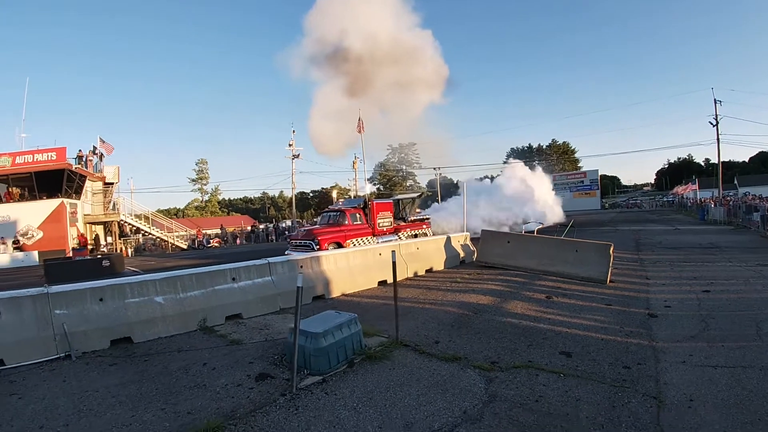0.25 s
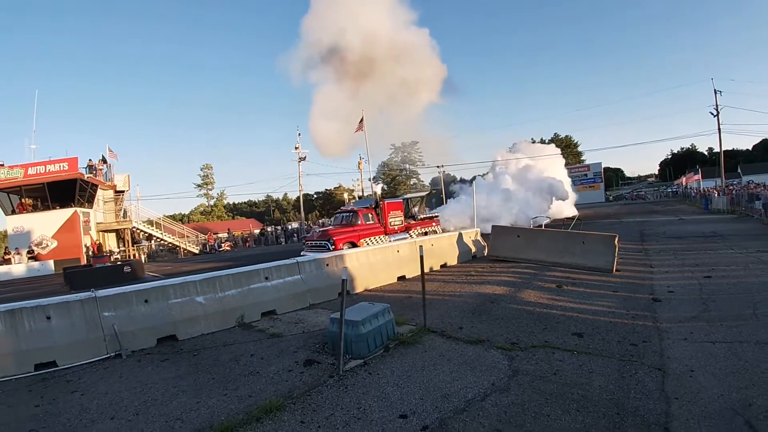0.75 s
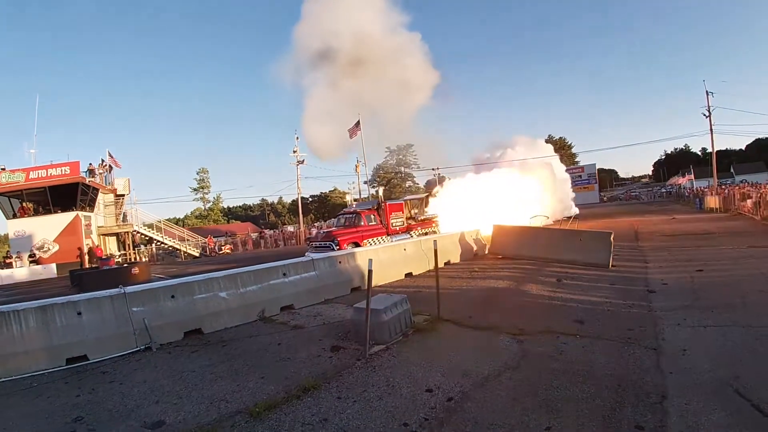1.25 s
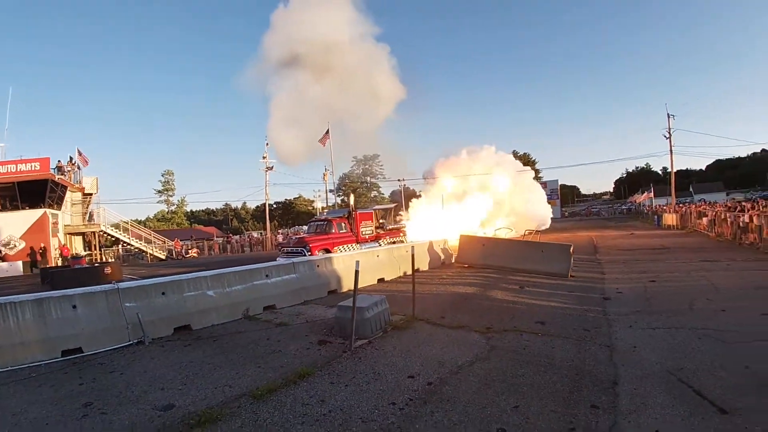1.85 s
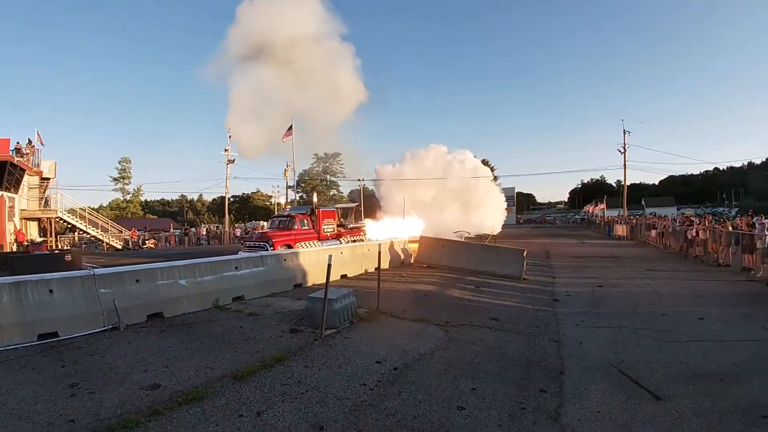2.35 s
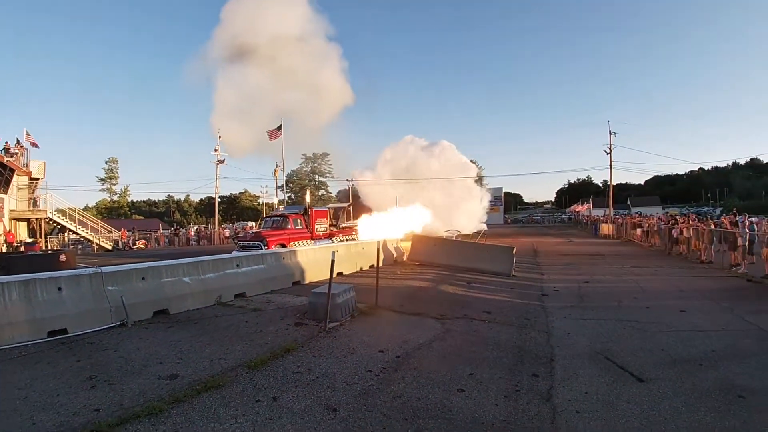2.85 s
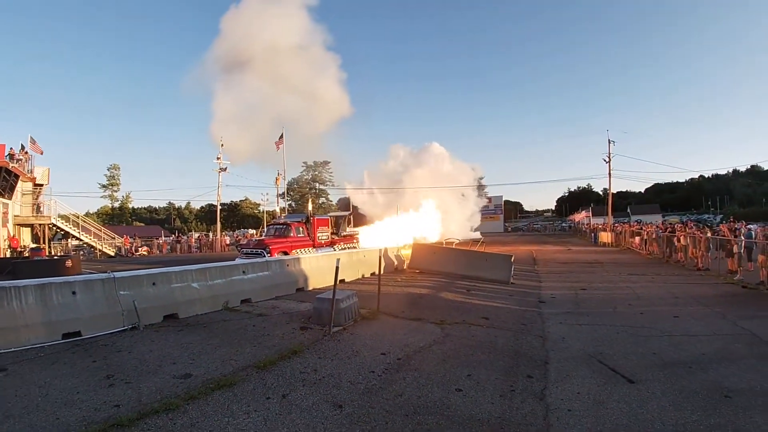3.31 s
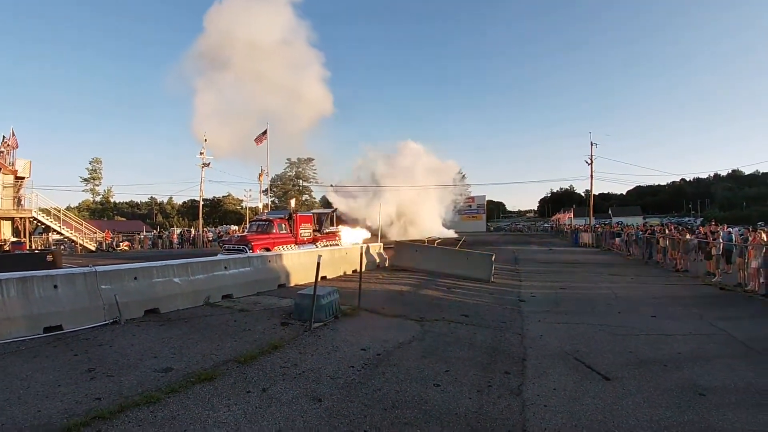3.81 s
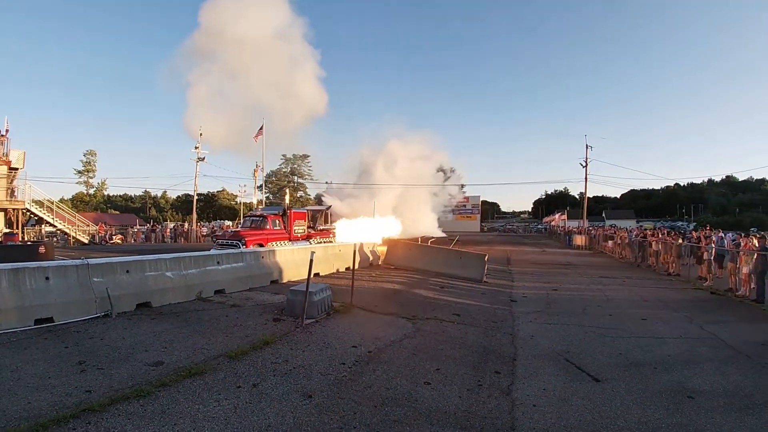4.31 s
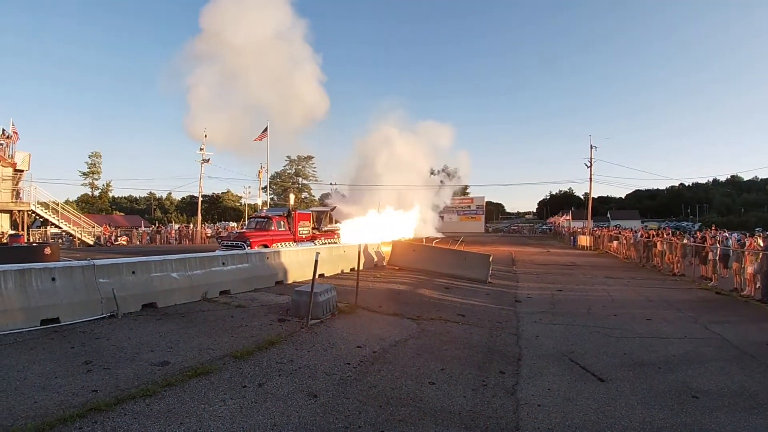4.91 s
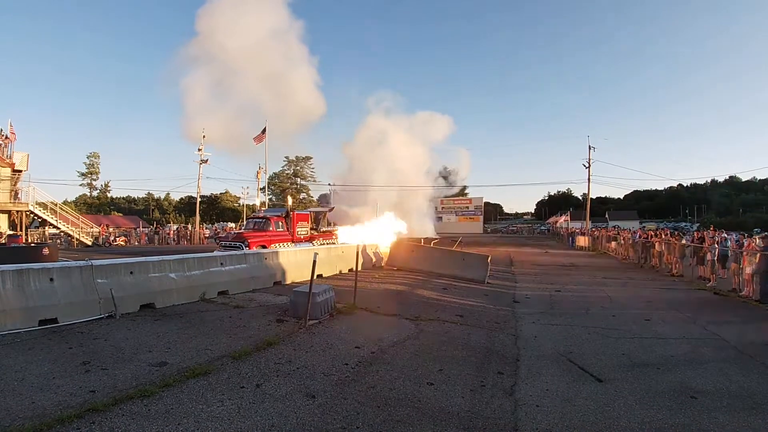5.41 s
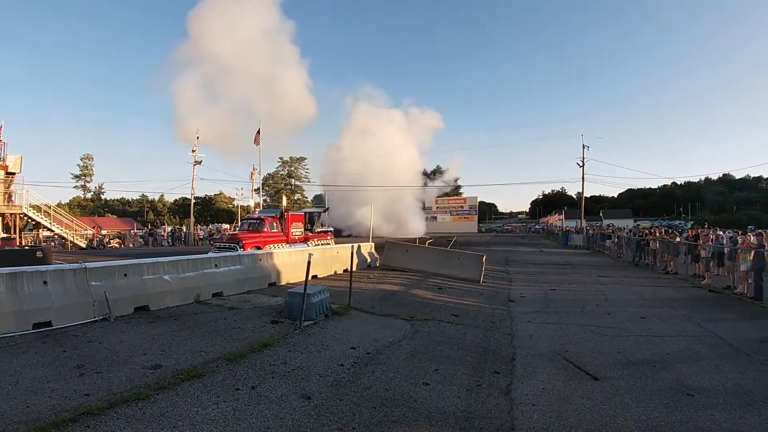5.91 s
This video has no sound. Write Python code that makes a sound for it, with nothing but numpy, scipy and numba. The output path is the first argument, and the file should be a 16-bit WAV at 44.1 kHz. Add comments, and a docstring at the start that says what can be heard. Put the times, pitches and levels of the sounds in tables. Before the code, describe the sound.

A jet truck idles loudly on an outdoor drag strip, its two turbines giving a dense, wavering, beating whine over airy hiss and low hum. After about a second the afterburner ignites with a hard thump, and a deep, ragged, stuttering roar pushes the whine down. At the end the flame dies and the whine returns. Phone microphone at some distance, compressing heavily.

```python
"""On a drag strip, a jet truck with two turbines idles, lights its afterburner and lets the flame die.
Compressor blade rows whine as sines on multiples of each shaft speed, over intake hiss of coloured noise.
The afterburner lights with a thump of decaying cosines and roars and rasps as coloured noise in a stuttering
flame. A phone's gain control turns everything down under it, letting the whine return as the flame dies."""
import sys
import numpy as np
from scipy import signal
from scipy.fft import rfft, irfft, next_fast_len
from scipy.io import wavfile
from scipy.ndimage import uniform_filter1d
from numba import njit

SR = 44100
rng = np.random.default_rng(int(sys.argv[2]) if len(sys.argv) > 2 else 0)


def store_pcm(level_fs):
    """Save levels as 16-bit WAV."""
    pcm = np.round(np.clip(level_fs, -1, 1) * 32767).astype(np.int16)
    wavfile.write(sys.argv[1], SR, np.atleast_2d(pcm).T)


N = 271656


def undb(db):
    """Decibel law: twenty dB is a factor of ten in amplitude."""
    return 10 ** (np.asarray(db) / 20)


def seconds():
    """Uniform sampling: the time of every sample in seconds."""
    return np.arange(N) / SR


def curves(table):
    """Linear interpolation: the columns after the first (time in s) as signals in time."""
    s, *columns = np.transpose(table)
    return [np.interp(seconds(), s, column) for column in columns]


def bumps(rows):
    """Superposition: a sum of bell-shaped rises, one for each (centre s, length s, height)."""
    t = seconds()
    return sum(height * np.exp(-((t - s) / max(length, 0.005)) ** 2) for s, length, height in rows)


def walk(rate_hz):
    """Band-limited fluctuation: random levels held 1 / rate s and averaged twice; spread near 1."""
    hold = int(SR / rate_hz)
    steps = np.repeat(rng.standard_normal(N // hold + 1), hold)
    slewed = uniform_filter1d(uniform_filter1d(steps, hold), hold)
    return 1.3 * slewed[:N]


def noise(spectrum):
    """Spectral shaping: white noise weighted by the given (Hz, dB) curve and scaled to rms 1."""
    hz, db = np.transpose(spectrum)
    size = next_fast_len(N)
    f = np.maximum(np.arange(size // 2 + 1) * SR / size, 1)
    weight = undb(np.interp(np.log(f), np.log(hz), db, -120, -120))
    x = irfft(rfft(rng.standard_normal(size)) * weight, size)[:N]
    return x / np.sqrt(np.mean(x ** 2))


def low_pass(x, hz, order):
    """Butterworth low-pass: maximally flat below its corner."""
    return signal.lfilter(*signal.butter(order, hz, fs=SR), x)


# Spectrum of the turbulent intake air. Each row: frequency in Hz, relative density in dB per Hz.
HISS_SPECTRUM = [(200, -39), (350, -1.5), (580, -2.5), (1000, -1), (1600, -0.5), (2400, -2.5), (3300, -1.5),
                 (3900, -3.5), (5200, -8.5), (7600, -10.5), (8900, -24.5), (9800, -25), (11500, -35),
                 (14000, -41)]
# Spectrum of the hiss that swells near 2.6 kHz. Each row: frequency in Hz, relative density in dB per Hz.
CLUSTER_SPECTRUM = [(2100, -20), (2400, -0.5), (2650, -2), (2900, -4), (3200, -18.5)]


def intake_hiss(cluster_db):
    """Turbulence noise: intake air hisses broadly, with a band near 2.6 kHz that swells."""
    hiss = undb(-19 + 0.19 * walk(6.7)) * noise(HISS_SPECTRUM)
    return hiss + undb(cluster_db - 30.0) * noise(CLUSTER_SPECTRUM)


def tone(hz, db, waver_hz, fade_db, flutter_db=2.0):
    """Scattering by turbulence: a blade tone wavers in pitch, fades and flutters in turbulent air."""
    phase = 2 * np.pi * (np.cumsum(hz + waver_hz * walk(25)) / SR + rng.random())
    level_db = db + fade_db * walk(4.04) + flutter_db * walk(18)
    return np.sqrt(2) * undb(level_db) * np.sin(phase)  # root 2 makes the level an rms


# Slow hunting of both shafts, before inertia smooths it.
# Each row: time in seconds, shaft speed of engine A in Hz, of engine B in Hz.
SHAFT_SPEEDS = [(0, 109.0, 113.16), (.55, 108.84, 113.02), (1.05, 108.9, 113.1), (1.35, 108.8, 112.75),
                (1.55, 108.98, 112.58), (2.2, 108.93, 112.76), (2.78, 108.42, 112.08),
                (3.65, 109.14, 113.58), (4.22, 108.26, 112.04), (5.05, 109.32, 113.66),
                (5.75, 108.42, 112.1), (6.16, 108.72, 112.9)]
# Strongest blade tones as multiples of the shaft speed. One column for each tone, no unit.
MAIN_ORDERS = (17, 20, 34, 51)
# Resting levels of the strongest tones. Each row is an engine (A, B), each column a main order, in dB.
MAIN_REST_DB = [(-36, -34.5, -34, -42.5), (-34.5, -33.5, -34, -44.5)]
# Swells of the strongest tones, nested by engine and main order.
# Each row: centre in seconds, length in seconds, rise in dB.
MAIN_SWELLS = [
    [[(0, 0.14, 6), (1.03, 0.18, 9.5), (1.4, .15, 8), (2.85, 0.14, 15), (5, .2, 5.5), (6.1, .15, 7)],
     [(.4, 0.088, 9), (.92, 0.31, 7.5), (1.7, .15, 7.5), (2.8, 0.23, 6), (3.2, 0.17, 3.5),
     (6.05, 0.39, 11)], [(.1, 0.36, 8), (.65, 0.13, 5.5), (1.7, 0.19, 6.5), (2.1, 0.073, 8),
     (3.5, 0.45, 10.5), (4.2, .12, 3), (4.93, 0.14, 9), (5.25, 0.085, 4)], [(3.3, .4, 3), (4.5, 0.47, 7),
     (5.2, 0.33, 4.5), (5.75, 0.18, 9.5)]],
    [[(1.35, 0.28, 5.5), (2, 0.12, 9.5), (2.35, 0.22, 10), (2.8, .15, 7.5), (3.2, 0.17, 9.5),
     (3.7, .15, 4.5), (4.1, .2, 2), (4.7, 0.18, 7), (5.4, 0.12, 9), (5.8, .1, 6.5), (6.16, .08, 6)],
     [(.05, 0.26, 9), (.55, 0.44, 5), (1.5, .25, 8), (2.33, 0.17, 6.5), (3.1, .15, 6.5), (4.95, .2, 5),
     (5.62, 0.18, 11), (6.16, 0.34, 16)], [(.2, .15, 4), (.75, 0.18, 4), (1.76, .1, 5), (3.1, .3, 13),
     (3.55, 0.17, 8), (4.18, 0.21, 10), (4.6, 0.23, 8.5), (5.68, 0.16, 8.5), (6.16, 0.11, 8)],
     [(.2, 0.49, 6), (3.7, .2, 6.5), (5.3, .3, 5)]],
]
# Weaker blade tones as multiples of the shaft speed. One column for each tone, no unit.
WEAK_ORDERS = (23, 26, 28, 37, 40, 42, 45, 60, 68, 85)
# Levels of the weaker tones. Each row is an engine (A, B), each column a weak order, in dB.
WEAK_DB = [(-35, -40, -46, -42, -44, -55, -48, -52, -45, -63),
           (-37, -50, -52, -38, -44, -48, -56, -55, -49, -66)]
# Steady-centred tones off both shaft series. Each row: frequency in Hz, level in dB.
LONE_TONES = [(657, -42.5), (1012, -39.5), (1265, -41.5), (2445, -46.5), (2670, -39.5), (2724, -40)]
INERTIA_S = 0.2  # averaging time of the shaft speed


def blade_whine(cluster_db, waver=0.001, weak_fade_db=2.5, main_fade_db=0.87):
    """Blade-passing tones: each row of blades sounds at a whole multiple of its shaft speed."""
    out = np.zeros(N)
    # pitch waver is a share of the frequency
    weak = [(hz, db, 2.46 * waver) for hz, db in LONE_TONES]
    for shaft_hz, rest_db, swells, weak_db in zip(curves(SHAFT_SPEEDS), MAIN_REST_DB, MAIN_SWELLS, WEAK_DB):
        shaft_hz = uniform_filter1d(shaft_hz, int(INERTIA_S * SR))
        weak += [(order * shaft_hz, db, waver) for order, db in zip(WEAK_ORDERS, weak_db)]
        for order, db, rows in zip(MAIN_ORDERS, rest_db, swells):
            hz = order * shaft_hz
            out += tone(hz, db + bumps(rows), waver * hz, main_fade_db)
    for hz, db, share in weak:
        # weak tones near 2.6 kHz swell together
        inside = 2400 < np.mean(hz) < 3000
        out += tone(hz, db + inside * cluster_db, share * hz, weak_fade_db)
    return out


# Reflection off the track, growing as the phone turns. Each row: time in seconds, share of amplitude.
GROUND_SHARE = [(1.4, 0.083), (3.3, 0.2)]
GROUND_LAG = 24  # samples


def track_reflection(whine):
    """Comb interference: an inverted late copy joins the direct sound; the rough track scatters its top."""
    share, = curves(GROUND_SHARE)
    return whine - share * np.roll(low_pass(whine, 4600, 2), GROUND_LAG)


def smoke_dulling(whine, smoke):
    """High-frequency absorption: smoke dulls a share of the whine above 3.2 kHz."""
    smoke = np.clip(smoke, 0, 1)
    return (1 - smoke) * whine + smoke * low_pass(whine, 3200, 1)


# Spectrum of the exhaust hum. Each row: frequency in Hz, relative density in dB per Hz.
EXHAUST_SPECTRUM = [(12, -48), (20, -23.5), (53, -7), (86, -7), (125, -0.5), (146, -3), (170, -9.5),
                    (320, -20.5), (600, -51.5)]
EXHAUST_DB, HOT_RISE_DB = -18, 8  # level at idle, and its rise from light-up on


def exhaust():
    """Jet mixing noise: the exhaust hums in the bass, louder from light-up on."""
    hot = np.clip((seconds() - FLAME[0][0]) / 0.2, 0, 1)
    return undb(EXHAUST_DB + HOT_RISE_DB * hot + 0.57 * walk(4.1)) * noise(EXHAUST_SPECTRUM)


# Course of the flame. Each row: time in seconds, roar level in dB, level of the tearing upper edge in dB
# relative to the roar, level of the deepest throb in dB relative to the roar.
FLAME = [(1.19, -33, -8, -10), (1.22, -8.5, -3.5, -15), (1.26, -4.5, -11, -9), (1.5, -3, -16, -11),
         (1.7, -3.5, -12.5, -9.5), (2.2, -1, -14, -10), (2.62, 0.5, -13, -9.5), (2.85, 2.5, -14, -10.5),
         (3.05, 4, -15.5, -16), (3.68, 4, -19, -11), (3.88, -0.5, -5.5, -6.5), (4.15, 3.5, -8, -8),
         (4.35, 1.5, -11.5, -12.5), (4.55, 3.5, -13, -15), (4.95, 1, -12, -9.5), (5.3, -1, -10, -4.5),
         (5.72, 0, -9.5, -15), (5.8, -6.5, -12.5, -11), (5.9, -12, -11.5, -4), (6.16, -15, -11, -10)]
# Stutters of the flame. Each row: centre in seconds, drop in dB, length in seconds.
STUTTERS = [(2.383, 7.5, 0.041), (2.567, 5, 0.058), (2.723, 11, 0.039), (2.942, 3, 0.026),
            (3.067, 4.5, 0.02), (3.5, 4, 0.045), (3.726, 6.5, .035), (4.234, 4, 0.057), (5.21, 4, 0.024),
            (5.918, 2, 0.036)]
# Spectra of the burning eddies, from the deepest throb to the roar and its tearing upper edge.
# Each row: frequency in Hz, relative density in dB per Hz.
THROB_SPECTRUM = [(10, -18.5), (20, -4.5), (40, -3.5), (65, -1.5), (100, -16)]
ROAR_SPECTRUM = [(12, -52), (20, -17), (49, -4.5), (103, -1.5), (140, -0.5), (210, -2), (270, -9),
                 (330, -20), (450, -53)]
EDGE_SPECTRUM = [(220, -13), (290, -1.5), (370, -2.5), (430, -7.5), (520, -27), (700, -49)]
EDGE_STUTTER_SHARE = 0.65  # the edge drops by this share of each stutter's dB


def flame_roar():
    """Combustion noise: large eddies of burning gas roar and throb in the bass, smaller ones tear above."""
    roar_db, edge_db, throb_db = curves(FLAME)
    drop_db = bumps([(s, length, db) for s, db, length in STUTTERS])
    roar = undb(0.9 * walk(13)) * noise(ROAR_SPECTRUM)
    throb = undb(throb_db) * noise(THROB_SPECTRUM)
    # gives back part of the drop that the whole flame takes below
    edge_db = edge_db + (1 - EDGE_STUTTER_SHARE) * drop_db + 0.74 * walk(9.2)
    edge = undb(edge_db) * noise(EDGE_SPECTRUM)
    return undb(roar_db - drop_db) * (roar + throb + edge)


# Spectrum of the rasping flame front. Each row: frequency in Hz, relative density in dB per Hz.
RASP_SPECTRUM = [(300, -17), (480, 2), (700, -6.5), (1000, -8.5), (1500, -13.5), (2500, -14.5)]
# Flares of the rasp when fresh fuel catches. Each row: start in seconds, end in seconds, rise in dB.
FLARES = [(1.195, 1.358, 3), (2.4, 2.65, 2.5), (3.8, 3.9, 1.5), (5.23, 5.76, 5.5), (6.04, 6.3, 4.5)]
FLARE_ATTACK_S, FLARE_RELEASE_S = 0.05, 0.023
RASP_DB, RASP_OUT_S, RASP_OUT_DB = -20.5, 5.77, -7.5  # level, time it sinks, change in dB


def flame_rasp(upper_db):
    """Flame-front noise: small eddies rasp steadily while burning, flare, and sink as the flame goes out."""
    t = seconds()
    rasp_db = RASP_DB + RASP_OUT_DB * np.clip((t - RASP_OUT_S) / 0.042, 0, 1)
    for start, end, db in FLARES:
        attack = np.clip((t - start) / FLARE_ATTACK_S, 0, 1)
        release = np.exp(-np.maximum(t - end, 0) / FLARE_RELEASE_S)
        rasp_db += db * attack * release
    onset = np.clip((t - FLAME[0][0]) / 0.017, 0, 1)
    return onset * undb(rasp_db + upper_db + 0.95 * walk(7.7)) * noise(RASP_SPECTRUM)


# Pressure fronts of the light-up, which ring briefly. Each row: start in seconds, level in dB,
# ringing frequency in Hz, decay time in milliseconds, signed amplitude factor.
THUMPS = [(1.189, -9.5, 131, 4.0, 0.98), (1.1946, 5, 131, 3.4, 1), (1.198, 0.5, 200, 2, 0.94),
          (1.1988, 11.5, 51, 15, -0.77)]


def light_up(rise_ms=0.49):
    """Transient radiation: each pressure front arrives within about a millisecond and swings out."""
    out, t = np.zeros(N), seconds()
    for s, db, hz, decay_ms, sign in THUMPS:
        since = np.maximum(t - s, 0)
        rise = 1 - np.exp(-(1000 * since / rise_ms) ** 2)
        decay = np.exp(-1000 * since / decay_ms)
        out += sign * undb(db) * rise * decay * np.cos(2 * np.pi * hz * since)
    return out


# Way to the listener. Each row: time in seconds, share of the whine dulled by smoke, level in dB of
# the sound above the roar (whine and rasp), further level in dB of weak tones and hiss near 2.6 kHz.
PATH = [(0, 0.18, 0, -1), (1.2, 0.23, 0.5, 1), (1.8, 0.079, 0, 1.5), (2.6, 0.19, -0.5, -3.5),
        (2.95, 0.7, -5, 5.5), (3.2, 0.69, -6.5, 4), (4, 0.74, -4.5, 2), (4.3, 0.67, -5.5, -3.5),
        (4.7, 0.61, -5.5, 7), (5.2, 0.61, -2.5, 6), (5.9, 0.49, -1, 3.5), (6.16, 0.62, 0, 3)]


def scene():
    """Superposition: the whine by way of track and smoke adds to exhaust, flame and light-up."""
    smoke, upper_db, cluster_db = curves(PATH)
    whine = undb(upper_db) * (intake_hiss(cluster_db) + blade_whine(cluster_db))
    whine = smoke_dulling(track_reflection(whine), smoke)
    afterburner = flame_roar() + flame_rasp(upper_db)
    return (whine + exhaust() + afterburner + light_up())[None]


@njit
def follow(x, attack, release, start):
    """Envelope detection: rises quickly and sinks at a steady number of dB a second."""
    e, out = start, np.empty(len(x))
    for i in range(len(x)):
        e = e + (x[i] - e) * attack if x[i] > e else e * release
        out[i] = e
    return out


TOP_HZ = 15100  # upper band limit


def record(dry, top_db=-9, attack_s=0.057, release_db=11, glide_s=0.024, peak_db=-4, recover_db=150):
    """Dynamic compression: slow gain control, quick peak limiter, soft rounding, then a cut of the top.

    Both release_db and recover_db are in dB per second."""
    x = dry[0]
    slow = follow(np.abs(x), 1 / (attack_s * SR), float(undb(-release_db / SR)), float(undb(top_db)))
    reduction = 1 - np.minimum(1, undb(top_db) / slow)
    # the gain glides to its new setting
    keep = np.exp(-1 / (glide_s * SR))
    x = x * (1 - signal.lfilter([1 - keep], [1, -keep], reduction))
    quick = follow(np.abs(x), 1 / (0.00092 * SR), float(undb(-recover_db / SR)), 0.1)
    limited = x * np.minimum(1, undb(peak_db) / quick)
    rounded = 0.86 * np.tanh(limited / 0.83)
    return signal.sosfilt(signal.ellip(8, 0.2, 70, TOP_HZ, fs=SR, output="sos"), rounded)[None]


dry = scene()
out = record(dry)
store_pcm(out)
```